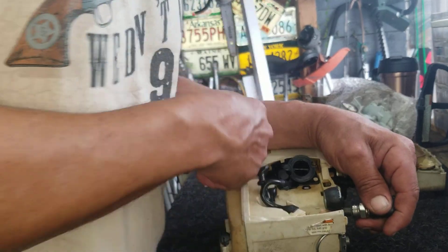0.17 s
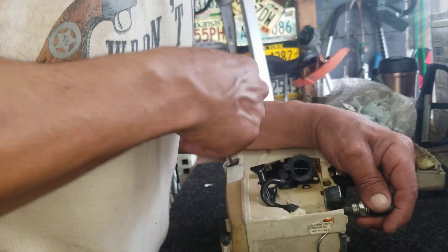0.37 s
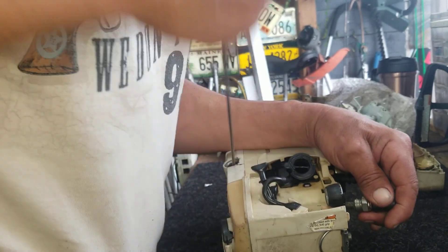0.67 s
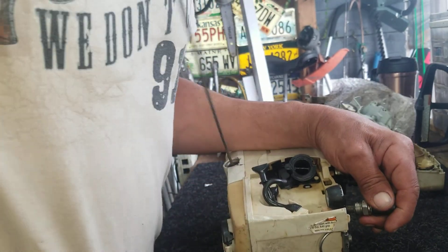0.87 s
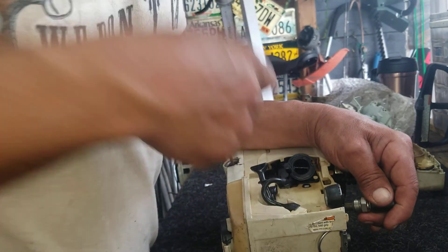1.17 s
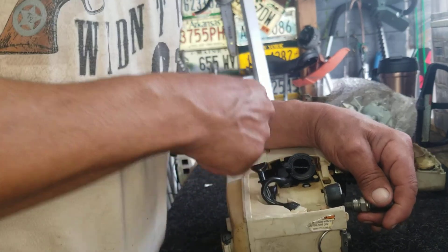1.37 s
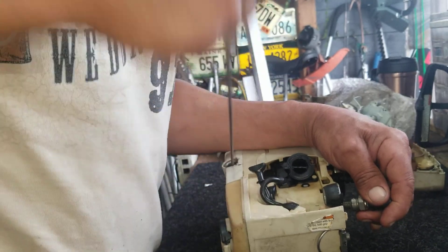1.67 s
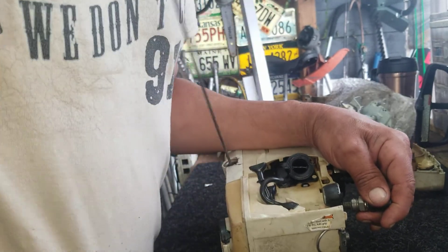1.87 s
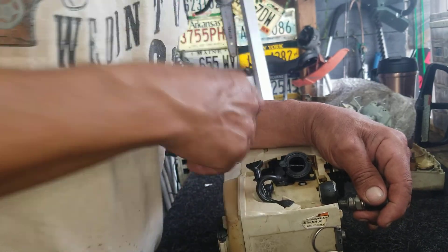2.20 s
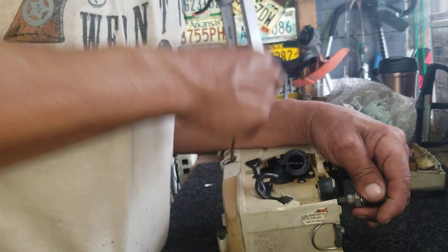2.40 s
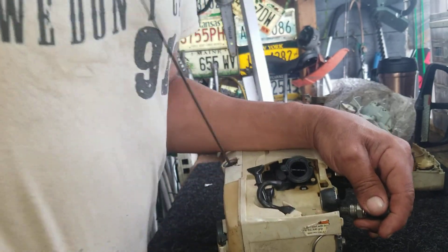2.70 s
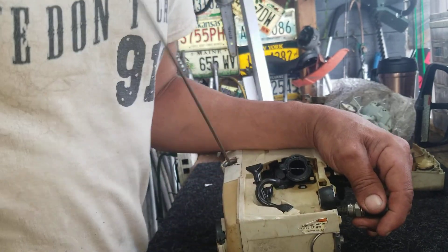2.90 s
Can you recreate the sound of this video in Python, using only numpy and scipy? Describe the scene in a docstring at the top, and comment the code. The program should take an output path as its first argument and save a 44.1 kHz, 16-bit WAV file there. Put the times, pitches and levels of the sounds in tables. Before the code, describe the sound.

A small chainsaw is cranked by its pull cord three times, close by in a workshop. Knocks lead into short bursts of low popping, hissing and rattling, the last loudest. It never fires, and a fan rushes steadily behind.

```python
"""On a workshop bench, a small two-stroke chainsaw is pulled over three times and never fires.
A fan-like rush fills the room. As the cord takes up, the starter knocks the housing into damped vibration.
The works rattle, and the piston pumps air out and in once a turn: each stroke rings the cylinder's air
with a low pop and drives a hissing jet through the opening. The starter pawls clank, one bright tick
sounds, the cord squeaks, and bench and room return short reflections."""
import sys
import numpy as np
from scipy import signal
from scipy.fft import rfft, irfft, next_fast_len
from scipy.io import wavfile
from scipy.ndimage import uniform_filter1d, map_coordinates

SR = 44100
rng = np.random.default_rng(int(sys.argv[2]) if len(sys.argv) > 2 else 0)


def to_wav(s):
    """Save 16-bit WAV."""
    ch = np.atleast_2d(s).T  # columns
    pcm = np.round(np.clip(ch, -1, 1) * 32767)  # PCM
    wavfile.write(sys.argv[1], SR, pcm.astype(np.int16))


N = 134505
T = np.arange(N) / SR

# fan noise: (frequency [Hz], relative density [dB])
FAN_SPECTRUM = [(20, -29), (45, -10), (62, -6), (80, 4.5), (105, -3.5), (150, -3), (220, 1), (320, -3),
                (460, -9), (780, -6.5), (1150, -14), (1700, -13), (4200, -18), (7200, -22), (9000, -29),
                (12000, -23), (15500, -32.5)]
# slow trend of the fan: (time [s], level [dB])
FAN_LEVEL = [(0, -32.8), (2.3, -32), (3.05, -34.5)]
# likeness of left and right, for fan and saw: (frequency [Hz], correlation [-])
FAN_CORRELATION = [(50, 0.9), (200, 1), (1200, -0.21), (4000, 0.021)]
SAW_CORRELATION = [(300, 0.94), (640, 0.84), (3100, -0.17), (12000, 0.072)]
# starter jerks: (time [s], ring level [dB], crack level [dB], pitch ratio [-])
HOUSING_KNOCKS = [(.137, -21.5, -34, 0.96), (.1440, -15, -36, 0.814), (.2575, -16.5, -33, 0.78),
                  (1.4772, -12.5, -29.5, 0.92), (2.2475, -19, -28.5, 0.86), (2.4295, -9, -19.5, 0.97)]
# modes of housing and pawl: (nominal frequency [Hz], relative level [dB], T60 [s])
HOUSING_MODES = [(270, -14, 0.027), (488, -8, 0.022), (760, -5, 0.014), (984, -3.5, 0.016),
                 (1990, -14.5, 0.014)]
PAWL_MODES = [(978, -2, 0.019), (1444, -3, .017), (1996, -12.5, 0.012)]
# noise of impacts, works, air jet and hollow port rush: (frequency [Hz], relative density [dB])
CRACK_SPECTRUM = [(300, 5), (1700, 7), (5500, 0), (9000, -10), (16000, -12)]
RATTLE_SPECTRUM = [(40, -23), (110, -1), (700, 0), (1080, -3), (1700, -8), (4500, -19), (16000, -29.5)]
HISS_SPECTRUM = [(400, -36), (1500, 0), (5500, 3), (7300, 1), (9000, -3), (11000, 3), (13000, 1.5),
                 (16000, -9)]
GASP_SPECTRUM = [(40, 3), (250, 5), (480, 0), (740, 1.5), (1150, -12), (2200, -34)]
# rattle envelopes, one list per pull: (time [s], level [dB])
RATTLE_LEVELS = [
    [(.6, -38), (.67, -31), (.84, -32), (.93, -54)],
    [(1.62, -40.5), (1.69, -31), (1.85, -33.5), (1.94, -60)],
    [(2.46, -42), (2.56, -30.5), (2.66, -21.5), (2.72, -24.5), (2.79, -32.5), (2.88, -37)],
]
# air sucked in and pushed out: (time [s], pop level [dB], hiss gain [dB])
INTAKE_STROKES = [(0.6358, -23, -43), (0.7138, -14.5, -31.5), (0.8036, -13, -31), (0.8896, -25, -32),
                  (1.7202, -15, -34), (1.8097, -17.5, -32), (1.9071, -23, -34), (2.4926, -18.5, -38),
                  (2.548, -8, -29), (2.6093, -2.5, -26.5), (2.6567, -1.5, -26), (2.702, -4, -25),
                  (2.7566, -7, -28.5), (2.832, -12.5, -32.5)]
EXHAUST_STROKES = [(0.664, -12, -29.5), (0.7553, -9.5, -28.5), (0.8397, -9, -23), (.906, -30.5, -31.5),
                   (1.6673, -12.5, -29.5), (1.762, -9.5, -27.5), (1.8511, -9.5, -25), (2.5803, -7, -27.5),
                   (2.632, -5, -19), (2.677, -3, -19), (2.7251, -6.5, -21.5), (2.787, -8.5, -27.5)]
# ring of the cylinder's air: (start frequency [Hz], end frequency [Hz], glide [s], rise [s], fall [s])
INTAKE_RING = (184, 276, .002, .0034, .0058)
EXHAUST_RING = (194, 252, .002, .0044, .006)
# narrow resonances of the opening: (frequency [Hz], half width [Hz], gain [dB])
OPENING_RESONANCES = [(7260, 430, 8.5), (10630, 320, 2.5)]
# pawl impacts: (time [s], lowest mode level [dB], upper mode level [dB])
PAWL_CLANKS = [(.681, -22, -26), (0.7702, -16.5, -22), (.852, -17, -25), (1.684, -19, -20.5),
               (1.775, -16, -15), (1.8657, -10.5, -10.5), (2.588, -16, -15), (2.647, -20, -15.5),
               (2.673, -15, -16), (2.691, -22, -19), (2.734, -33, -7), (2.7998, -33, -13.5)]
# the cord in its eyelet: (time [s], level [dB], frequency [Hz])
CORD_SQUEAKS = [(1.761, -32, 12000), (1.774, -30, 11850), (2.740, -33, 13100)]
# reverberation of the workshop: (frequency [Hz], T60 [s])
ROOM_DECAY = [(200, 0.27), (12000, 0.069)]
# channel balance: (frequency [Hz], left minus right [dB])
STEREO_BALANCE = [(60, -1), (330, 0), (650, 3), (2200, 3.5), (9000, -1)]


def amp(db):
    """Amplitude grows tenfold per 20 dB."""
    return 10 ** (np.asarray(db) / 20)


def unit(x):
    """Normalisation to rms 1."""
    return x / np.sqrt(np.mean(x ** 2) + 1e-20)


def along(points, hz):
    """Interpolation on a logarithmic frequency axis."""
    f, v = np.transpose(points)
    return np.interp(np.log(hz + 1), np.log(f + 1), v)


def wobble(rate):
    """Smooth random modulation: a spline through rate knots a second."""
    return map_coordinates(rng.standard_normal(int(N * rate / SR) + 4), [T * rate])


def filtered(x, response):
    """Linear filtering: the spectrum times a frequency response."""
    size = next_fast_len(N + SR // 2)
    return irfft(rfft(x, size) * response(np.fft.rfftfreq(size, 1 / SR)), size)[..., :N]


def spread(pair, correlation):
    """Mid-side mixing gives two independent signals a set correlation."""
    angle = lambda hz: np.arccos(np.clip(along(correlation, hz), -1, 1)) / 2
    mid, side = filtered(pair, lambda hz: np.array([np.cos(angle(hz)), np.sin(angle(hz))]))
    return np.array([mid + side, mid - side])


def noise(spectrum, correlation=SAW_CORRELATION, grain=1):
    """Source and filter: white noise, modulated by grain, is coloured and scaled to rms 1."""
    white = grain * rng.standard_normal((2, N))
    coloured = filtered(white, lambda hz: amp(along(spectrum, hz)))
    return unit(spread(coloured, correlation))


def patchy(x, depth_db):
    """Random modulation in patches some hundred hertz wide and some milliseconds long."""
    spectra = signal.stft(x, nperseg=256)[2]
    field = uniform_filter1d(rng.standard_normal(spectra.shape[1:]), size=4, axis=0)
    field = unit(uniform_filter1d(field, size=5, axis=1))
    return unit(signal.istft(spectra * amp(depth_db * field), nperseg=256)[1][:, :N])


def swell(t, rise_s, fall_s):
    """Gaussian rise to t = 0, then exponential decay."""
    return np.exp(-(np.minimum(t, 0) / rise_s) ** 2 - np.maximum(t, 0) / fall_s)


def fan():
    """Broadband noise with a low spectral peak: a rush and drone that waver in level."""
    level_db = np.interp(T, *np.transpose(FAN_LEVEL)) + 0.77 * wobble(14.1)
    return amp(level_db) * noise(FAN_SPECTRUM, FAN_CORRELATION)


def strike(onset, db, modes, pitch, scatter_db, skew_rad, attack_s=0.0016):
    """Modal superposition: a blow rings damped modes, their level and phase varying by side."""
    out = np.zeros((2, N))
    near = np.abs(T - onset) < 0.1
    t = T[near] - onset
    for (hz, mode_db, t60), force_db in zip(modes, np.broadcast_to(db, len(modes))):
        gain = amp(force_db + mode_db + scatter_db * rng.standard_normal((2, 1)))
        phase = 2 * np.pi * hz * pitch * (t - attack_s / 2) + skew_rad * rng.standard_normal((2, 1))
        out[:, near] += gain * swell(t, attack_s, t60 / np.log(1000)) * np.cos(phase)
    return out


def housing():
    """Impulse excitation: heavily damped modes knock under a short crack; a small steel part pings."""
    rings, cracks = np.zeros((2, N)), np.zeros(N)
    for onset, db, crack_db, pitch in HOUSING_KNOCKS:
        rings += strike(onset, db, HOUSING_MODES, pitch, scatter_db=2.5, skew_rad=0.3)
        cracks += amp(crack_db) * swell(T - onset, rise_s=0.0024, fall_s=0.012)
    ping_s = HOUSING_KNOCKS[2][0]  # with the third knock
    ping_hz, ping_db, ping_t60 = 5100, -40.5, 0.2
    ping_level = amp(ping_db) * swell(T - ping_s, 1 / SR, ping_t60 / np.log(1000))
    return rings + cracks * noise(CRACK_SPECTRUM) + ping_level * np.sin(2 * np.pi * ping_hz * T)


def works():
    """Amplitude-modulated noise: pulley, cord and crank rattle in fine grains, swelling with each pull."""
    level = sum(amp(np.interp(T, *np.transpose(pull), left=-np.inf, right=-np.inf))
                for pull in RATTLE_LEVELS)
    rattle = noise(RATTLE_SPECTRUM, grain=amp(3.3 * wobble(350)))
    return level * patchy(rattle, depth_db=1.5)


def pop(peak_s, start_hz, end_hz, glide_s, rise_s, fall_s):
    """Cavity resonance: the cylinder's air rings for a few cycles, its pitch rising as the piston moves."""
    t = T - peak_s
    hz = start_hz + (end_hz - start_hz) * (1 + np.tanh(t / glide_s)) / 2
    cycles = np.cumsum(hz) / SR
    envelope = np.exp(-(np.minimum(t, 0) / rise_s) ** 2 - (np.maximum(t, 0) / fall_s) ** 1.26)
    return envelope * np.cos(2 * np.pi * (cycles - np.interp(peak_s, T, cycles)))


def piston():
    """Air displacement: the two strokes pop with opposite sign, each just after a burst of flow noise."""
    pops, jet, gasp = np.zeros((3, N))
    for time, db, hiss_db in EXHAUST_STROKES:
        pops -= amp(db) * pop(time, *EXHAUST_RING)
        flow = swell(T - time + 0.002, rise_s=0.0024, fall_s=0.0038)
        jet += amp(hiss_db) * flow
        gasp += amp(db + 2.5) * flow
    for time, db, hiss_db in INTAKE_STROKES:
        turn_s = min(abs(time - other[0]) for other in INTAKE_STROKES if other[0] != time)
        lead_s = 0.13 * turn_s  # the hiss peaks this long before the pop
        pops += amp(db) * pop(time, *INTAKE_RING)
        jet += amp(hiss_db) * swell(T - time + lead_s, rise_s=1.1 * lead_s, fall_s=1.26 * lead_s)
        gasp += amp(db) * swell(T - time + lead_s / 2, rise_s=1.3 * lead_s, fall_s=0.01)
    opening = lambda f: amp(sum(db / (1 + ((f - hz) / width) ** 2)
                                for hz, width, db in OPENING_RESONANCES))
    hiss = noise(HISS_SPECTRUM, grain=amp(0.73 * wobble(900)))
    hiss = patchy(filtered(hiss, opening), depth_db=1.5)
    return pops + jet * hiss + amp(-16) * gasp * noise(GASP_SPECTRUM)


def pawls():
    """Modal excitation: a pawl lands dully or brightly as its low and upper modes share the blow."""
    rings, cracks = np.zeros((2, N)), np.zeros(N)
    for onset, low_db, high_db in PAWL_CLANKS:
        pitch = 1 + 0.035 * rng.standard_normal()
        force_db = [low_db] + [high_db] * (len(PAWL_MODES) - 1)
        rings += strike(onset, force_db, PAWL_MODES, pitch, scatter_db=0.5, skew_rad=0.36)
        cracks += amp(-28) * swell(T - onset, rise_s=0.0018, fall_s=0.0045)
    return rings + cracks * noise(CRACK_SPECTRUM)


def tick():
    """Broadband transient: one sharp, bright tick, perhaps a spark, sounds in the second pull."""
    return amp(-18.5) * swell(T - 1.6858, rise_s=0.00075, fall_s=0.004) * noise(HISS_SPECTRUM)


def cord():
    """Frequency-modulated tones: the cord gives thin, wavering squeaks."""
    waver_hz = 200 * wobble(1200)
    squeaks = np.zeros(N)
    for time, db, hz in CORD_SQUEAKS:
        tone = np.sin(2 * np.pi * np.cumsum(hz + waver_hz) / SR)
        squeaks += amp(db) * swell(T - time, rise_s=0.0058, fall_s=0.0058) * tone
    return squeaks


def reflect(x, response):
    """Convolution with an energy-normalised impulse response, delayed by 2.5 ms."""
    delayed = np.pad(response / np.linalg.norm(response[0]), ((0, 0), (SR // 400, 0)))
    return signal.fftconvolve(x, delayed, axes=1)[:, :N]


def workshop(x, early_db, early_t60, room_db):
    """Early reflections from bench and body, and short reverberation from the cluttered room."""
    hz, t, spectra = signal.stft(rng.standard_normal((2, SR // 2)), SR, nperseg=256)
    decay = amp(-60 * t / along(ROOM_DECAY, hz)[:, None])
    tail = signal.istft(spectra * decay, SR, nperseg=256)[1]
    t = np.arange(tail.shape[1]) / SR
    early = rng.standard_normal(tail.shape) * amp(-60 * t / early_t60)
    scatter = filtered(reflect(x, early), lambda f: f ** 2 / (f ** 2 + 480 ** 2))  # high-pass
    return spread(amp(early_db) * scatter + amp(room_db) * reflect(x, tail), SAW_CORRELATION)


def scene():
    """Superposition of the nearby saw, its reflections and the fan."""
    saw = piston() + works() + cord() + tick() + pawls() + housing()
    return saw + workshop(saw, early_db=-7, early_t60=0.046, room_db=-19.5) + fan()


def record(dry):
    """Frequency response: two microphones of unequal colour share one band limit."""
    top_hz = 15900
    balance = lambda hz: amp(np.outer([1, -1], along(STEREO_BALANCE, hz)) / 2)
    return filtered(dry, lambda hz: balance(hz) * (hz < top_hz))


dry = scene()
out = record(dry)
to_wav(out)
```